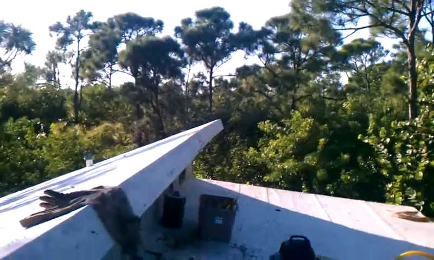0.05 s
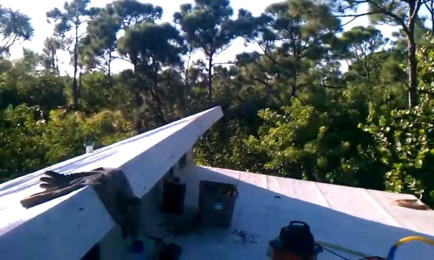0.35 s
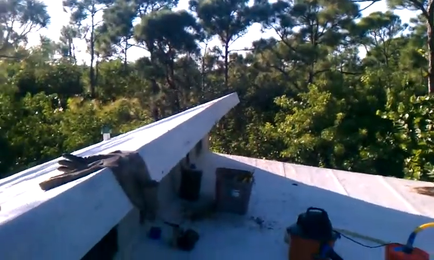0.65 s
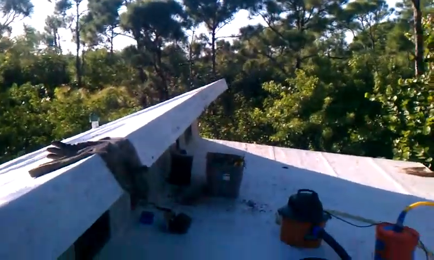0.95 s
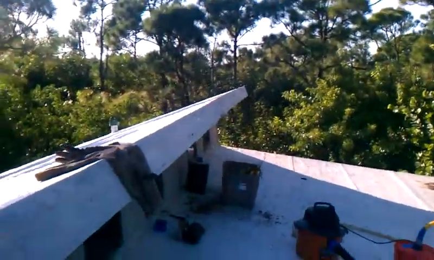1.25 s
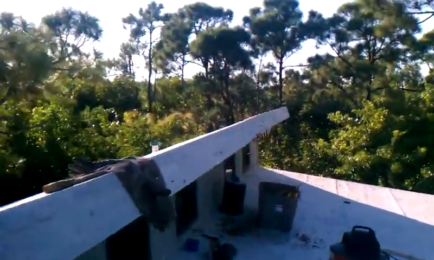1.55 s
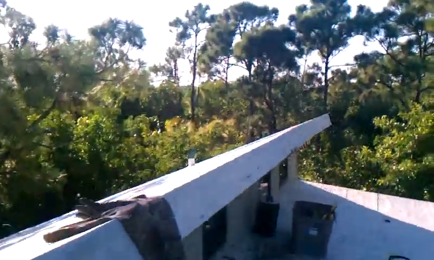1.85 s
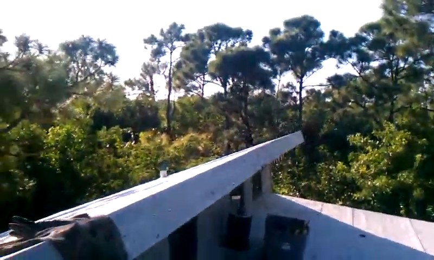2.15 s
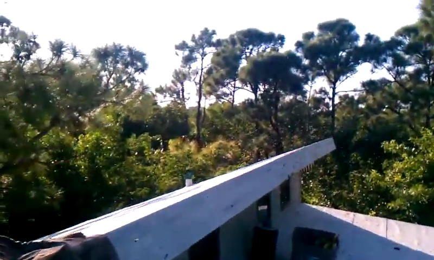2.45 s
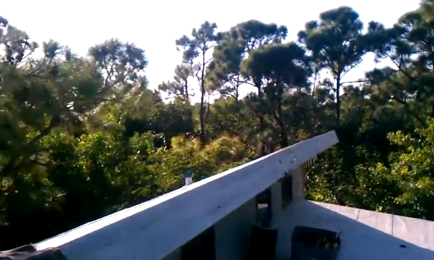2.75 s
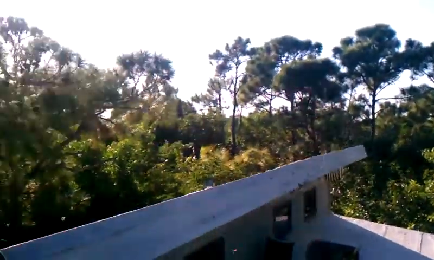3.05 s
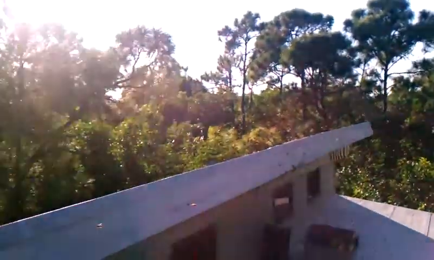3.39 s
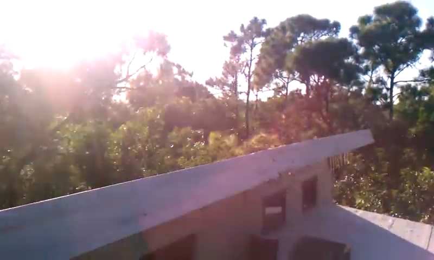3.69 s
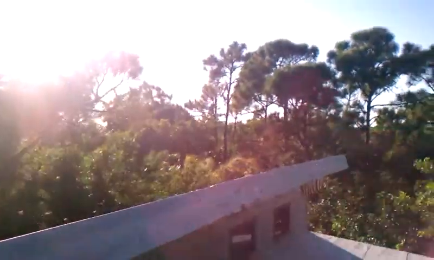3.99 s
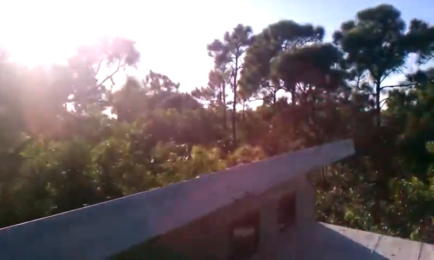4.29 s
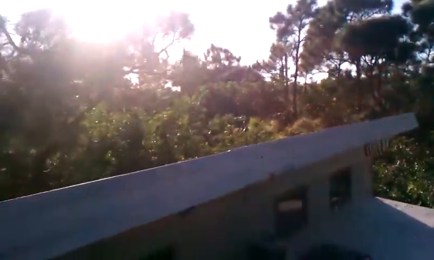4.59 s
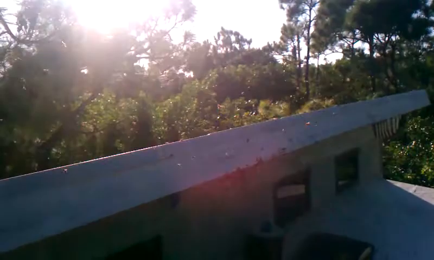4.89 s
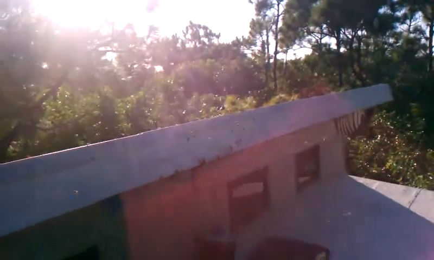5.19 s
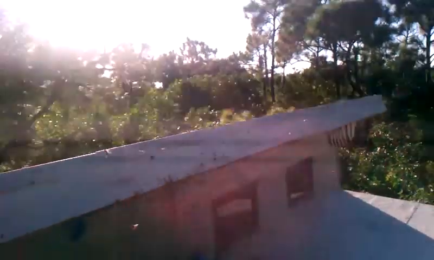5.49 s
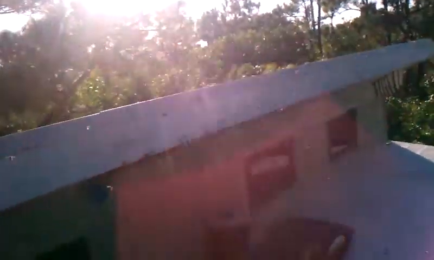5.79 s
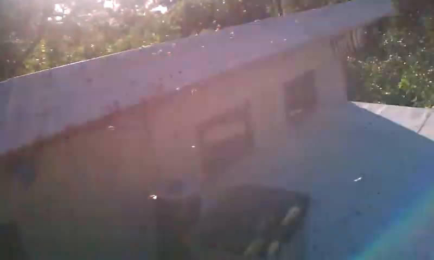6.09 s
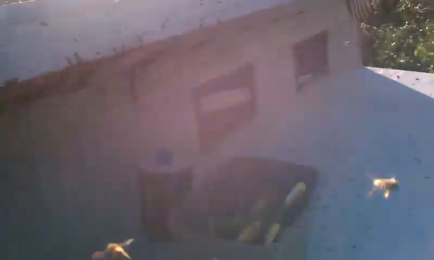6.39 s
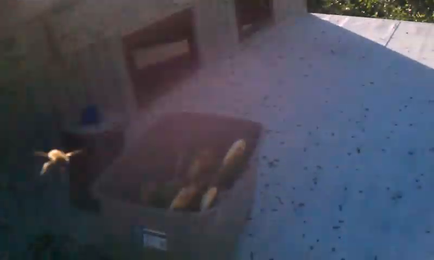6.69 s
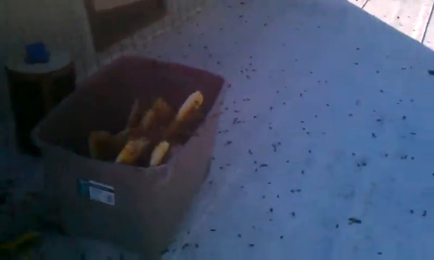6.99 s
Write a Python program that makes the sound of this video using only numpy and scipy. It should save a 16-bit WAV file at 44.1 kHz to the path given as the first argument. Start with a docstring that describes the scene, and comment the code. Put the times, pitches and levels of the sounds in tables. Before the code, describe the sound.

A swarm of bees buzzes under the steady rush and whine of a shop vacuum running nearby outdoors. The thin, telephone-like microphone opens a moment late, then catches a cluster of low wind puffs and one soft knock from the hand. The vacuum's tone shifts slowly and grows a little louder in the second half, and its pitch begins to drop in the last instant as it is switched off.

```python
"""A shop vacuum runs on a flat roof, a few metres from a hand-held camera, with honey bees swarming overhead.
Its motor whines and its air rushes through hose, tank, housing and exhaust; a reflection off the roof
sweeps slowly as the camera turns. At the very end the motor is switched off and its pitch starts to sag.
Wind buffets the narrow-band microphone, which opens a moment late; the hand bumps the camera once."""
import sys
import numpy as np
from scipy import signal
from scipy.fft import rfft, irfft
from scipy.io import wavfile

SR = 44100
rng = np.random.default_rng(int(sys.argv[2]) if len(sys.argv) > 2 else 0)


def transcribe(signal):
    """Save signal, clipped to [-1, 1], as a 16-bit WAV file at the path in sys.argv[1]."""
    frames = np.atleast_2d(signal).T
    limited = np.clip(frames, -1, 1)
    pcm = np.round(limited * 32767).astype(np.int16)
    wavfile.write(sys.argv[1], SR, pcm)


N = 315050
TIME = np.arange(N) / SR
FREQS = np.maximum(np.arange(N // 2 + 1) * SR / N, 1)
BAND_HZ = 4366  # upper limit of the microphone's band

# hose resonance: time_s, level_db
HOSE_RING = [(1.3, -43.5), (2.0, -33.5), (3.1, -30), (4.05, -26.5), (4.7, -33), (5.6, -36.5), (6.2, -30.5),
             (7.1, -32)]
# tank resonance, shifting as the camera turns: time_s, level_db, centre_hz
TANK_RING = [(.7, -29, 1230), (1.6, -26.5, 1293), (2.0, -31.5, 1540), (3.1, -32, 1080), (3.6, -29.5, 1650),
             (4.25, -27, 1557), (4.75, -27.5, 1380), (5.6, -29.5, 1480), (7.1, -29.5, 1600)]
# motor housing resonance: time_s, level_db, centre_hz
HOUSING_RING = [(.7, -30, 1800), (1.75, -33, 2000), (2.25, -30, 2069), (3.1, -26, 2039), (3.8, -36, 1980),
                (4.3, -26, 2030), (4.95, -35.5, 1900), (5.8, -30, 1900), (7.1, -30, 1800)]
# exhaust hiss: time_s, level_db, centre_hz
EXHAUST_HISS = [(.7, -42.5, 3346), (2.0, -51.5, 3350), (2.9, -48, 3450), (3.55, -39, 3580),
                (4.3, -37.5, 3365), (5.3, -33, 3263), (6.25, -37, 3250), (7.1, -36.5, 3473)]


def undb(db):
    """Decibels to amplitude."""
    return 10 ** (np.asarray(db) / 20)


def unit(x):
    """Scale to rms 1."""
    return x / np.sqrt(np.mean(x ** 2))


def curves(table):
    """Each column of a time table, at every sample."""
    time_s, *columns = np.transpose(table)
    return [np.interp(TIME, time_s, column) for column in columns]


def gains(outline, hz):
    """Gain of a (Hz, dB) outline at the given frequencies."""
    outline_hz, db = np.transpose(outline)
    return undb(np.interp(np.log(hz), np.log(outline_hz), db))


def resonance(hz, width_hz, freqs=FREQS):
    """Steep band-pass: a resonance applied twice."""
    return 1 / (1 + ((freqs / hz - hz / freqs) * hz / width_hz) ** 2)


def walk(rate_hz, size=512):
    """Glide to a new random value rate_hz times a second; spread near 1."""
    return np.interp(TIME * rate_hz + rng.random(), np.arange(size), rng.standard_normal(size))


def noise(shape):
    """Turbulence with the given spectral shape; rms 1."""
    re, im = rng.standard_normal((2, len(FREQS)))
    return unit(irfft((re + 1j * im) * shape, N))


def hiss(width_hz, hz):
    """Turbulence ringing one resonance, whose centre may move; rms 1."""
    offset_hz = np.fft.fftfreq(N, 1 / SR)
    re, im = rng.standard_normal((2, N))
    swell = np.fft.ifft((re + 1j * im) / (1 + (2 * offset_hz / width_hz) ** 2))
    carrier = np.exp(2j * np.pi * np.cumsum(hz * np.ones(N)) / SR)
    return unit(np.real(swell * carrier))


def level_dips():
    """Twice the whole sound drops within a few milliseconds and creeps back."""
    dips = [(1.753, 3.5, .5), (5.492, 5.5, 0.92)]  # sudden drops: start_s, depth_db, recovery_s
    return undb(sum(np.interp(TIME, [start, start + .0029, start + recovery], [0, -depth, 0])
                    for start, depth, recovery in dips))


def wind(breeze_db=-46.5, gust_db=5.5, puff_hz=122, puff_top_hz=340, hard_db=-24, hz_per_db=7.5):
    """A light breeze rumbles on the microphone, with short puffs."""
    puffs = [(1.715, .022, -21.5), (1.765, 0.019, -17), (1.797, 0.0088, -16), (1.838, 0.014, -27),
             (2.08, 0.012, -23.5), (2.17, .012, -35), (2.345, 0.0082, -31), (2.419, 0.027, -27.5),
             (3.19, 0.026, -35.5), (3.305, .037, -28), (3.46, 0.026, -34), (4.94, 0.031, -33.5),
             (5.29, 0.046, -36)]  # puffs on the microphone: centre_s, half_length_s, level_db
    out = noise(resonance(hz=125, width_hz=280)) * undb(breeze_db + gust_db * walk(14))
    size = 16384
    offset_s = (np.arange(size) - size / 2) / SR
    freqs = np.maximum(np.fft.rfftfreq(size, 1 / SR), 1)
    low_pass = 1 / (1 + (freqs / puff_top_hz) ** 8)
    for centre_s, half_length_s, level_db in puffs:
        hz = puff_hz + hz_per_db * max(level_db - hard_db, 0)  # hard puffs sound brighter
        swell = np.exp(-.5 * (offset_s / half_length_s) ** 2)
        shape = low_pass * resonance(hz, 2.2 * hz, freqs)
        puff = irfft(rfft(rng.standard_normal(size)) * shape) * swell
        puff *= np.sqrt(np.sum(swell ** 2) / np.sum(puff ** 2))
        out += undb(level_db) * np.interp(TIME - centre_s, offset_s, puff, 0, 0)
    return out


def hand_bump(attack_s=.0026):
    """A soft knock of the hand rings the camera body briefly."""
    knock = (2.385, 428, -13, .055)  # ring of the camera body: start_s, pitch_hz, level_db, t60_s
    start_s, pitch_hz, level_db, t60_s = knock
    age = np.maximum(TIME - start_s, 0)
    envelope = undb(level_db - 60 * age / t60_s) * (1 - np.exp(-age / attack_s))
    return envelope * np.sin(2 * np.pi * pitch_hz * age)


def bees(wing_hz=261, spread=.095, swerve=.035, nearness_db=9, count=20, size=1024):
    """Each bee beats its wings at its own rate, bends the pitch as it swerves and swells as it nears."""
    wing_spectrum = [(250, -3.5), (500, -17), (750, -6), (1000, -6), (1500, -3), (2000, -3), (3000, -23),
                     (4000, -27)]  # harmonics of a wing stroke: frequency_hz, gain_db
    swarm_level = [(.7, -33.5), (2.6, -34.5), (3.8, -30), (4.7, -37), (6.0, -34.5), (7.1, -29.5)]  # the swarm drifts toward the microphone and away: time_s, level_db
    harmonics = np.arange(1, int(BAND_HZ / wing_hz) + 1)
    swarm = 0
    for excitement in np.linspace(-1, 1, count):
        phases = np.exp(2j * np.pi * rng.random(size)[harmonics])
        stroke = irfft(np.r_[0, gains(wing_spectrum, harmonics * wing_hz) * phases], size)
        detune = spread * (excitement + excitement ** 2 / 2)  # a few beat much faster
        hz = wing_hz * (1 + detune + swerve * walk(6))
        place_in_stroke = np.cumsum(hz) / SR % 1 * size
        buzz = np.interp(place_in_stroke, np.arange(size + 1), np.r_[stroke, stroke[0]])
        swarm += undb(nearness_db * np.tanh(walk(2.5))) * buzz
    return unit(swarm) * undb(curves(swarm_level)[0])


def roof_reflection(sound, strength_at_1_ms=.18):
    """The bounce off the roof combs the sound, more weakly as its lag grows; the power is kept."""
    bounce = [(.7, 0.88), (1.7, 0.82), (2.5, 1.015), (3.5, 1.08), (4.25, 1.4), (5.0, 1.76), (6.0, 2.12),
              (7.1, 2.1)]  # delay behind the direct sound: time_s, lag_ms
    lag_ms = curves(bounce)[0]
    strength = strength_at_1_ms / lag_ms
    delayed = np.interp(TIME - lag_ms / 1000, TIME, sound)
    return (sound + strength * delayed) / np.sqrt(1 + strength ** 2)


def exhaust_whistle(waver=.028, width_hz=90, share_db=-7):
    """The exhaust jet whistles thinly and wavers in pitch."""
    db, hz = curves(EXHAUST_HISS)
    return undb(db + share_db) * hiss(width_hz, hz * (1 + waver * walk(7)))


def hose_hoot(pitch_hz=885, width_hz=65, waver=.02, share_db=-4.5):
    """Air rings the hose at one narrow, wandering resonance within its broad one."""
    return undb(curves(HOSE_RING)[0] + share_db) * hiss(width_hz, pitch_hz * (1 + waver * walk(2.7)))


def motor(vanes=7, second_db=-40.5, wobble_hz=.98, flutter_db=3, wander_db=1.5, jitter_rad=.22):
    """The shaft sings; its upper overtones and the fan tone waver and swell with nearby resonances."""
    shaft_speed = [(.6, 519.5), (3.0, 519.7), (3.6, 520.4), (5.0, 520.6), (7.03, 520.0), (7.14, 480.0)]  # turning rate, falling at switch-off: time_s, speed_hz
    shaft_tone = [(.7, -38.5), (1.4, -38), (2.65, -41), (3.2, -28.5), (4.1, -27.5), (4.5, -48),
                  (4.9, -31.5), (5.55, -24), (6.2, -27.5), (7.0, -31)]  # fundamental, fading where reflections cancel it: time_s, level_db
    speed_hz = curves(shaft_speed)[0]
    phase = 2 * np.pi * np.cumsum(speed_hz + wobble_hz * walk(14)) / SR
    tank_db, tank_hz = curves(TANK_RING)
    housing_db, housing_hz = curves(HOUSING_RING)
    exhaust_db = curves(EXHAUST_HISS)[0]
    fan_ring = resonance(hz=3440, width_hz=230, freqs=vanes * speed_hz) ** 2  # met as the fan slows
    harmonics = {1: undb(curves(shaft_tone)[0]),
                 2: undb(second_db),
                 3: undb(tank_db - 6) * resonance(tank_hz, width_hz=600, freqs=3 * speed_hz),
                 4: undb(housing_db - 7) * resonance(housing_hz, width_hz=380, freqs=4 * speed_hz),
                 vanes: undb(exhaust_db + 9) * fan_ring}
    whine = 0
    for k, gain in harmonics.items():
        flutter = flutter_db * min(k / 2, 1) * walk(13)  # moving air shakes short waves more
        wander = wander_db * (k > 1) * walk(3.5)
        jitter = jitter_rad * min(k - 1, 2) * walk(25)
        whine += gain * undb(flutter + wander) * np.sin(k * phase + jitter + 2 * np.pi * rng.random())
    return np.sqrt(2) * whine


def airflow(hose_hz=864.7, rush_trim_db=-.5, rasp_db=2.6, flutter_db=1.38, surge_db=.3):
    """Turbulent air rings the vacuum's paths and reaches the microphone directly and off the roof."""
    rush_level = [(.7, -29.5), (1.8, -27), (3.3, -29.5), (4.3, -32), (4.8, -25), (5.8, -23), (7.1, -27)]  # broad rush of air: time_s, level_db
    rush_spectrum = [(200.0, -11.5), (400.0, -2.5), (650.0, -2), (1200.0, -0.5), (2400.0, -5.5),
                     (3000.0, -11.5), (4200.0, -17.5)]  # colour of that rush: frequency_hz, gain_db
    air_paths = [(407, -0.9), (504, -0.97), (310, 0.5), (554, -1.35)]  # resonances of hose, tank, housing, exhaust: width_hz, gain_db
    rings = [(*curves(HOSE_RING), hose_hz), curves(TANK_RING), curves(HOUSING_RING), curves(EXHAUST_HISS)]
    rush_db = curves(rush_level)[0] + rush_trim_db + rasp_db * walk(70)  # eddies make the rush rasp
    air = undb(rush_db) * noise(gains(rush_spectrum, FREQS))
    for (db, hz), (width_hz, gain_db) in zip(rings, air_paths):
        air += undb(db + gain_db + flutter_db * walk(30)) * hiss(width_hz, hz)
    return roof_reflection(air) * undb(surge_db * walk(35))


def scene():
    """The vacuum a few metres off, bees overhead, wind and handling at the microphone; mono."""
    vacuum = airflow() + hose_hoot() + exhaust_whistle() + motor()
    return ((vacuum + bees() + wind() + hand_bump()) * level_dips())[None]


def record(dry, low_hz=62, edge_hz=3750, top_hz=16000, open_s=.654, fade_s=.014, tick_s=4.976):
    """The microphone's telephone-like band fades in quickly; one faint bright tick sounds on top."""
    low_cut = 1 + (low_hz / FREQS) ** 4
    high_cut = (1 + (FREQS / edge_hz) ** 24) * (1 + (FREQS / BAND_HZ) ** 70)
    narrow = irfft(rfft(dry) / np.sqrt(low_cut * high_cut), N)
    fade_in = np.clip((TIME - open_s) / fade_s, 0, 1)
    impulse = undb(-15) * (np.arange(N) == int(tick_s * SR))
    tick = signal.lfilter([1], [1, -.6], impulse)
    top_cut = signal.ellip(8, .2, 80, top_hz, fs=SR, output="sos")
    return signal.sosfilt(top_cut, narrow * fade_in + tick)


dry = scene()
out = record(dry)
transcribe(out)
```